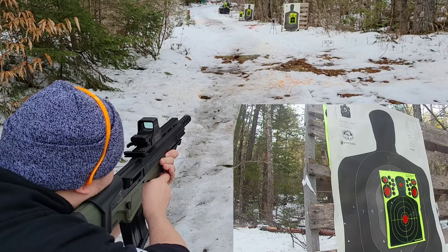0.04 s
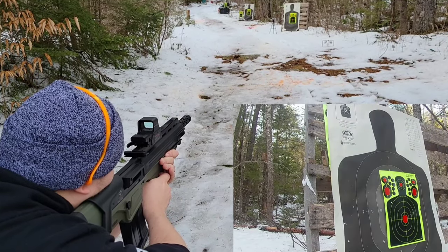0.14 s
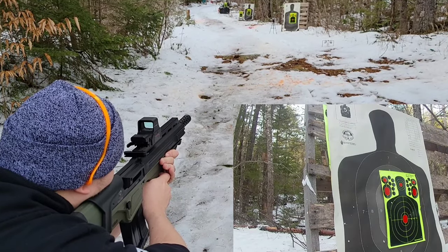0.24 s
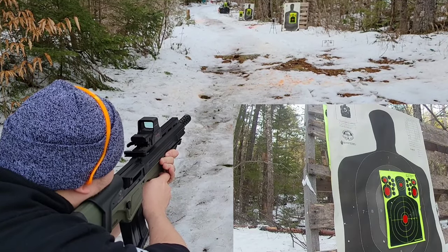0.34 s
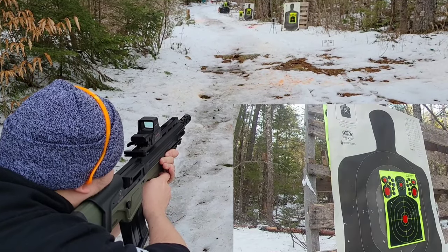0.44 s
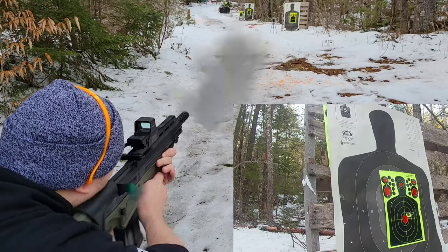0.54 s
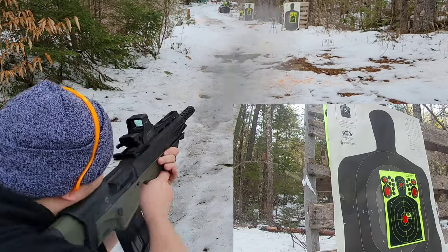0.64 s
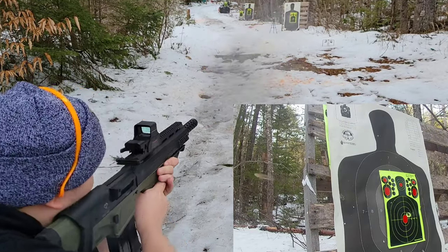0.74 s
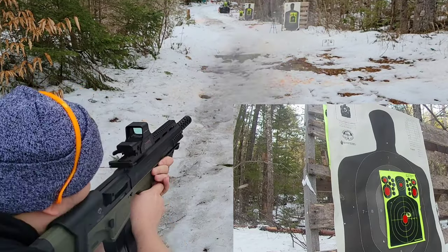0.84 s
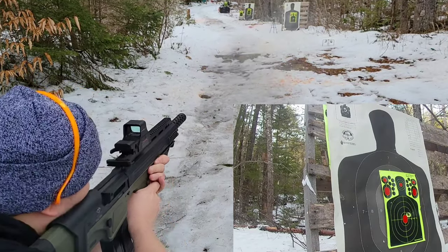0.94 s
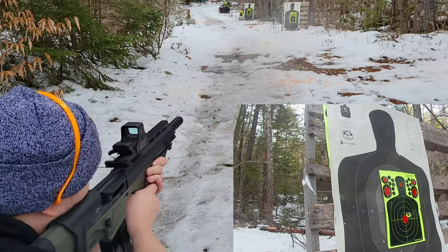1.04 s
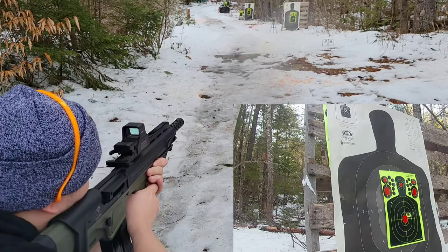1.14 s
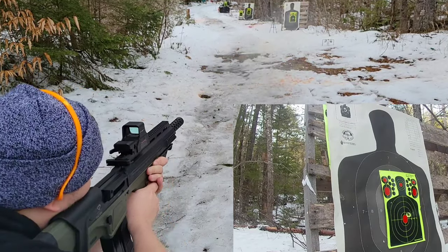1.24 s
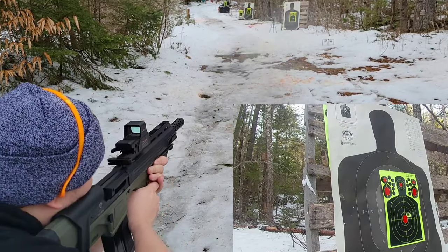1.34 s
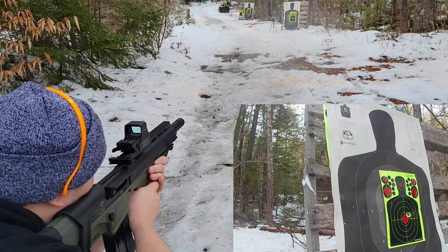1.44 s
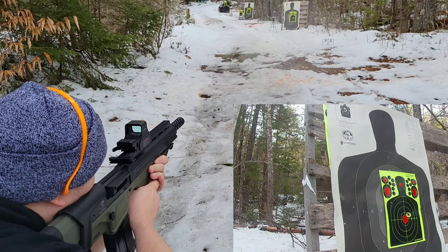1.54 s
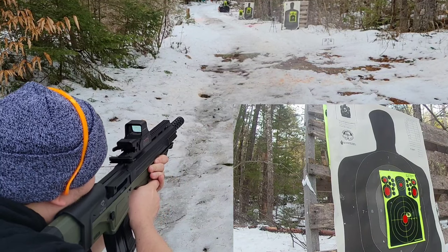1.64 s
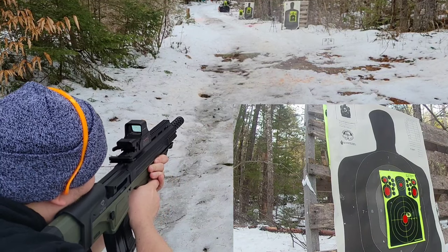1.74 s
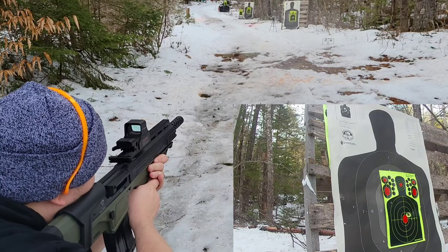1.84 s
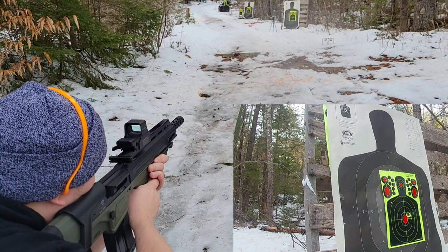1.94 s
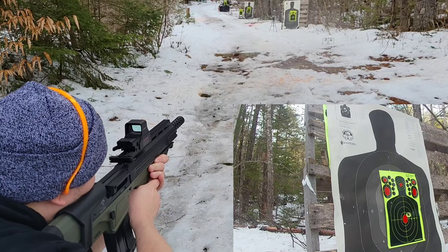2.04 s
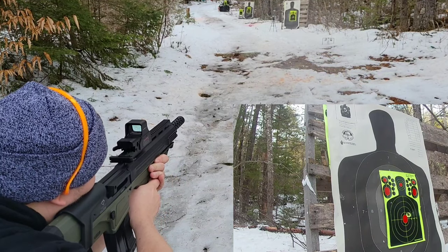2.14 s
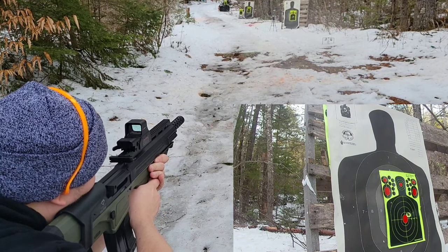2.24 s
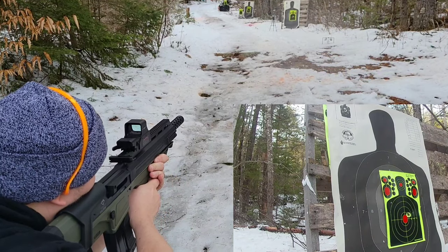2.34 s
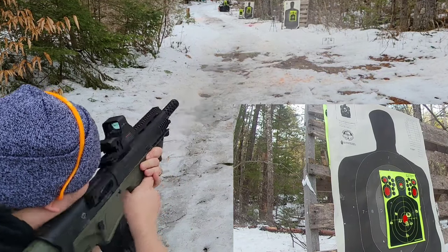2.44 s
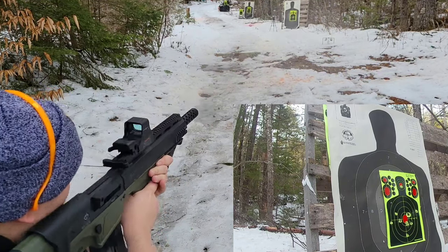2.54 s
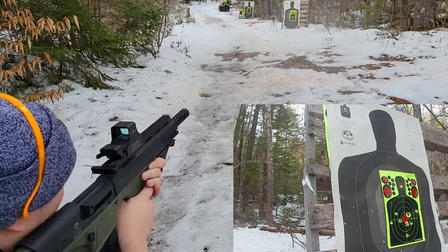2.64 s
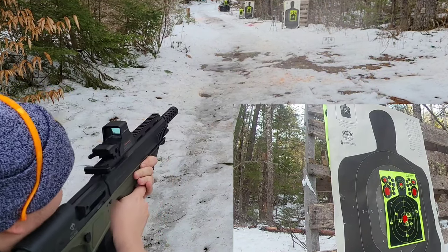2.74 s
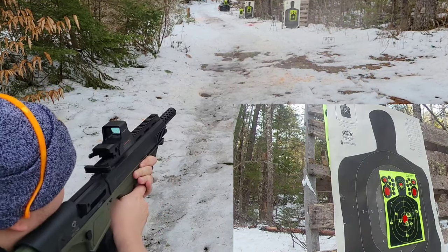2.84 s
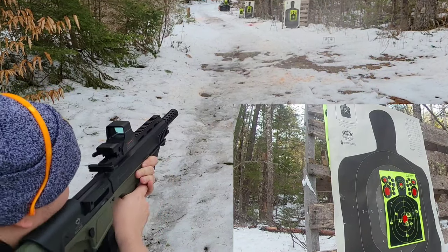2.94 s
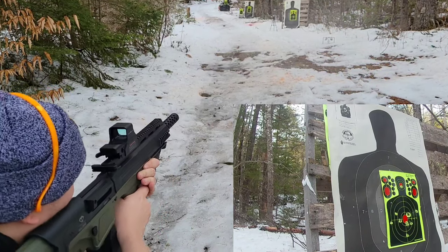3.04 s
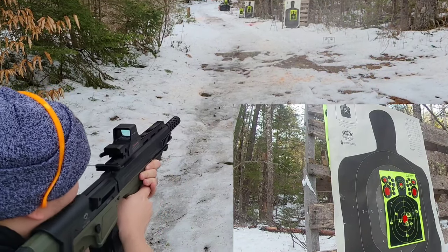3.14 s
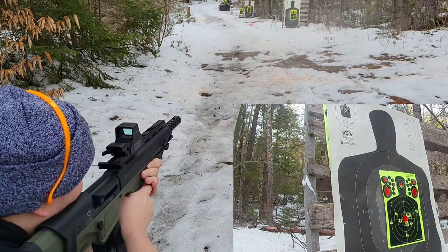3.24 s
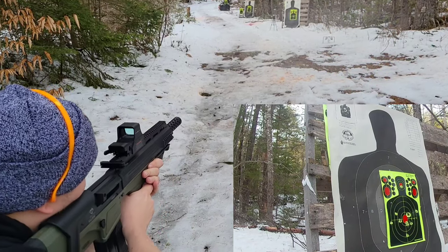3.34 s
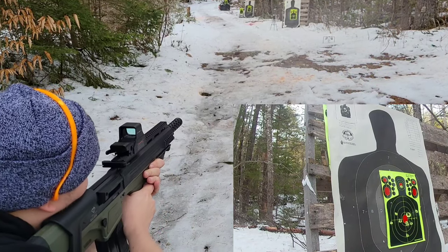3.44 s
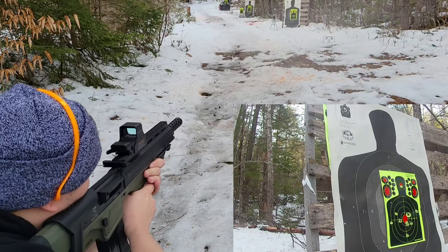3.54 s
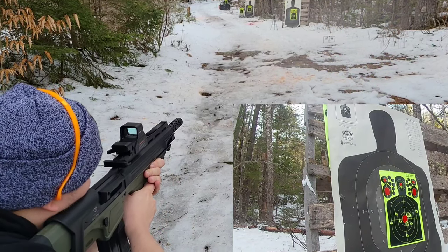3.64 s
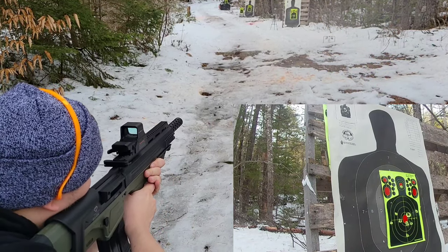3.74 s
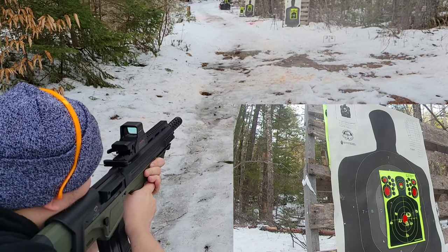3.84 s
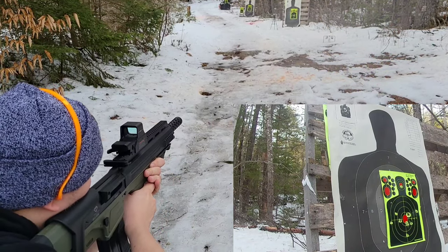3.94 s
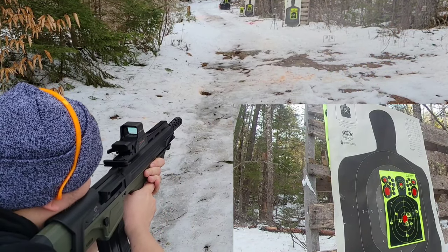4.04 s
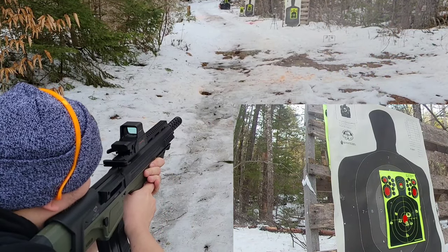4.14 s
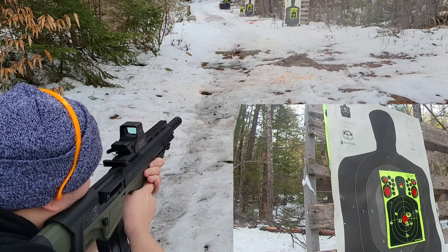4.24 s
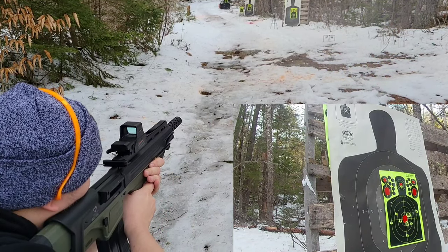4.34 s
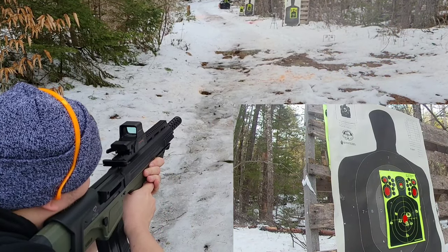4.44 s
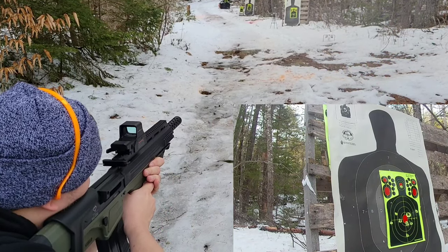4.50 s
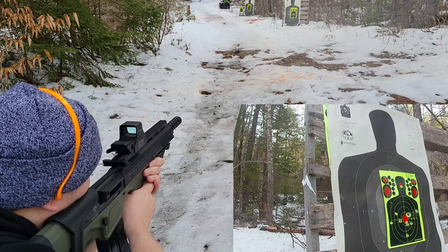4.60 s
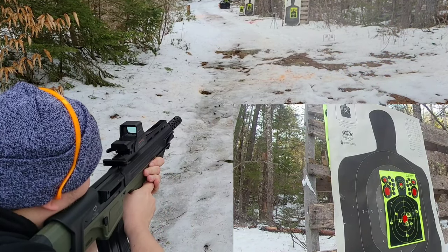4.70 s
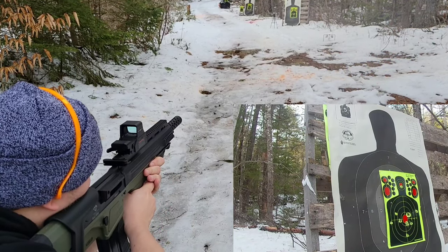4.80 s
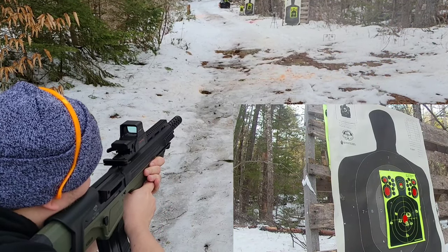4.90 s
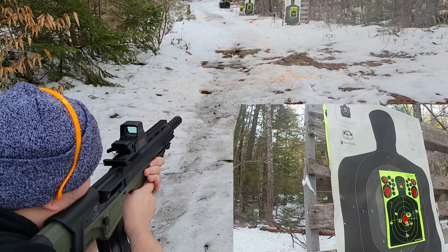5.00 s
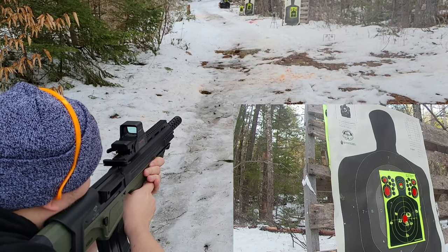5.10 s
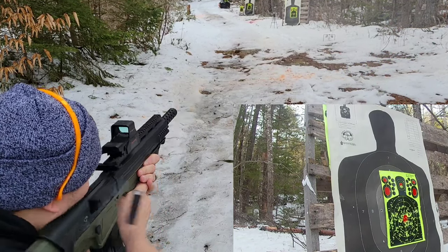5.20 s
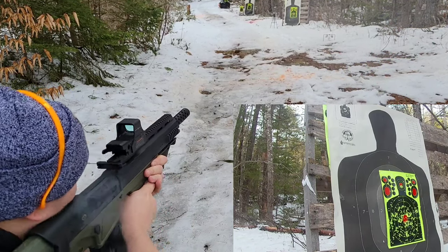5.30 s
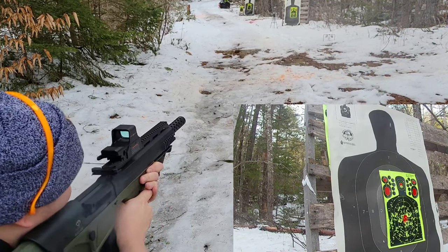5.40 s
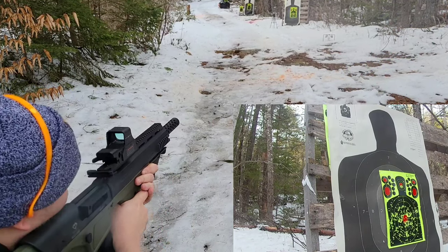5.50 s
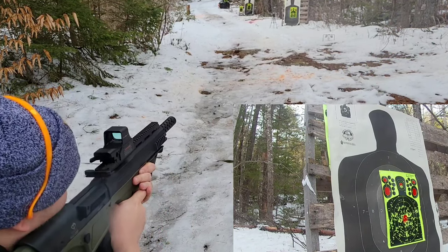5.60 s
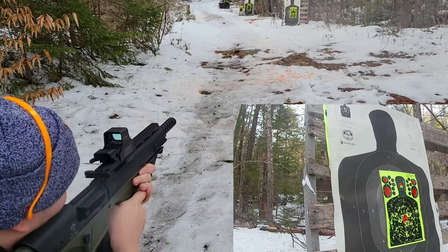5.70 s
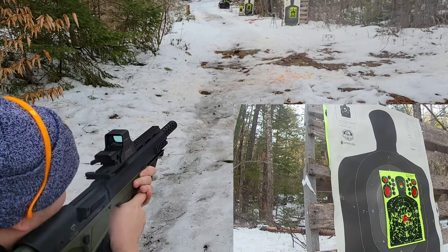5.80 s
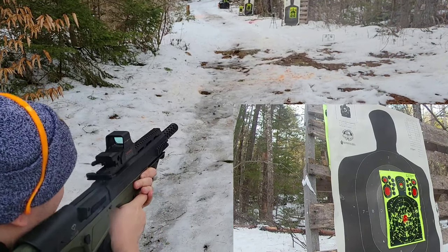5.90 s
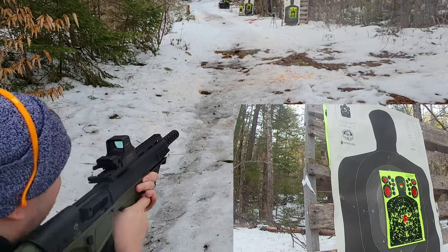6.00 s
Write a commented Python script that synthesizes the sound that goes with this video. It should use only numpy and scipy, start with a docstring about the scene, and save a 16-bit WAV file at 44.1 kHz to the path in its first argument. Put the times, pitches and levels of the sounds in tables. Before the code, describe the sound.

A self-loading shotgun fires three times at close range, each harsh bang rolling off through the forest, with faint clicks and shell clinks.

```python
"""Faint open air, then three shots from a self-loading shotgun, close by on a snowy range in the woods.
Each bang swells in on a short metallic rush, overloads the microphone with a hard rasp and a low thump,
and rolls away among the trees. The bolt slams shut just after each shot; the trigger and action click
as the gun is handled, and loose metal and falling shells clink."""
import sys
import numpy as np
from scipy import signal
from scipy.io import wavfile
from scipy.ndimage import uniform_filter1d

SR = 44100
rng = np.random.default_rng(int(sys.argv[2]) if len(sys.argv) > 2 else 0)


def transcribe(signal):
    """Save signal, clipped to [-1, 1], as a 16-bit WAV file at the path in sys.argv[1]."""
    frames = np.atleast_2d(signal).T
    limited = np.clip(frames, -1, 1)
    pcm = np.round(limited * 32767).astype(np.int16)
    wavfile.write(sys.argv[1], SR, pcm)


N = 267246

# How alike the two microphone ports hear. Each row: frequency in Hz, correlation.
PORT_LIKENESS = [(40, .92), (200, 0.96), (300, 0.81), (450, -0.35), (650, .12), (950, -0.44), (1500, -0.61),
                 (2050, 0.24), (3100, 0), (16000, -0.14)]
# The bed of outdoor air. Each row: frequency in Hz, relative level in dB.
AIR_COLOUR = [(20, -5.5), (65, -1.5), (130, -10), (300, -13), (600, -16.5), (1200, -20.5), (2000, -27),
              (3000, -32.5), (7200, -40.5), (8500, -47), (16000, -50)]
# The shots. Each row: start in seconds, blast in dB, woods in dB, bite near 2 kHz in dB, thump in dB,
# thump bass tilt in dB per octave down, thump delay in seconds, bolt delay in seconds, bolt in dB.
SHOTS = [(0.5878, -2, -12.5, 4, -16, 8, 0.012, 0.1, -10.5),
         (2.4369, -6.5, -15.5, 0, -0.5, -1, 0.0097, 0.087, -5.5),
         (5.2382, -7.5, -16, 2, -4.5, 5, 0.0194, 0.0855, -16.5)]
# Colour and decay of the opening rush, near blast, forest echo, steel clash and gun-body knock.
# Each row: frequency in Hz, relative level in dB, time to fall 60 dB in seconds.
RUSH_BANDS = [(24.98, 2.5, 0.77), (92.15, 3, 0.84), (220, -8.5, 0.94), (500, -0.5, 1), (800, -3, 0.97),
              (1280, -2.5, 0.81), (1498, 6, 0.94), (2202, -8.5, 0.94), (3260, -1, 1), (4420, -7, 0.89),
              (9400, -13.5, 0.99), (15500, -11.5, 0.76)]
BLAST_BANDS = [(20.07, -4, .4), (60, 4, 0.34), (264, 3, 0.6), (453, -5, 0.3), (754, -2, 0.52),
               (890, -3.5, 0.93), (1470, 1, 0.74), (2000, -3.5, 0.35), (2620, -8, 0.35), (3430, -6.5, .4),
               (5000, -11.5, .42), (7500, -13, .4), (8950, -19.5, 0.39), (12700, -14, .33),
               (16000, -16.5, .3)]
WOODS_BANDS = [(20, -9, 0.78), (50, -1, 0.34), (83.2, 11.5, 1.3), (127, -4.5, 1.6), (283, -1, 3.91),
               (420, -1, 3.36), (664, 0.5, 2.836), (1100, -1, 2.5), (1470, -8.5, 2.49), (2050, -10.5, 2.09),
               (2550, -15.5, 1.875), (4470, -17.5, 1.216), (7650, -19, 0.76), (8800, -28.5, 0.68),
               (14000, -24.5, 0.28)]
STEEL_BANDS = [(200, -23, 0.02), (2080, -4.5, .04), (4580, -8, .04), (6500, 4.5, 0.037), (9800, -11.5, .04),
               (12700, 1, 0.055), (15500, -3.5, 0.045)]
KNOCK_BANDS = [(300, -19, 0.034), (800, -10, 0.03), (1210, 8, .03), (1710, -15, 0.021), (2280, -1, 0.032),
               (2800, 0, 0.023), (3300, 0, 0.033), (4000, -15, 0.024), (5960, -10, 0.027),
               (9000, -16, 0.027), (16000, -47, 0.022)]
# The metallic ring in each rush. Each row: pitch in Hz, relative level in dB.
RUSH_TONES = [(1520, -10.5), (3020, -17), (3620, -13)]
# Modes of the microphone housing. Each row: multiple of the lowest pitch, relative level in dB.
HOUSING_MODES = [(1, -2.5), (1.379, -7), (2.279, -10)]
# Low resonances rocked by the blast. Each row: pitch in Hz, level in dB, time to fall 60 dB in seconds.
THUMP_MODES = [(202.7, -1, 0.22), (120.5, -10, 0.17), (46, -18.5, 0.1)]
# Low buffets of air. Each row: peak time in seconds, level in dB, pitch in Hz, left minus right in dB.
BUFFETS = [(0.671, -8, 95, 18), (2.497, -4.5, 125, 0), (5.2649, -7.5, 124, 4)]
# Trigger and action clicks. Each row: start in seconds, level in dB, ring pitch in Hz, snap level in dB.
CLICKS = [(1.872, -47, 3790, -56), (3.449, -59.5, 3500, -80), (3.574, -65, 3500, -80),
          (5.1198, -38, 3280, -59.5)]
# A clicking part's ring. Each row: multiple of its pitch, level in dB, time to fall 60 dB in seconds.
CLICK_MODES = [(0.7, -6, 0.02), (1, -3, 0.023), (1.61, -14.5, 0.024)]
# Loose metal and falling shells. Each row: start in seconds, level in dB.
CLINKS = [(2.750, -36.5), (5.608, -35), (5.619, -37), (5.705, -41), (5.863, -40), (5.954, -46.5)]


def amp(db):
    """Decibels to gain."""
    return 10 ** (np.asarray(db) / 20)


def unit_rms(x):
    """The signal scaled to an rms of 1."""
    return x / np.sqrt(np.mean(x ** 2) + 1e-20)


def wobble(n, size):
    """A random curve of rms 1 that changes over about size samples."""
    return unit_rms(uniform_filter1d(rng.standard_normal(n), size=size))


def read(table, hz, column=1):
    """One column of a table along a logarithmic frequency axis."""
    rows = np.array(table, float)
    return np.interp(np.log(hz + 1), np.log(rows[:, 0] + 1), rows[:, column])


def add(mix, start, sound):
    """Lay a sound into the mix at start seconds."""
    part = mix[:, round(start * SR):][:, :sound.shape[-1]]
    part += sound[..., :part.shape[1]]


def mode(t, hz, t60):
    """One struck resonance, falling 60 dB in t60 seconds."""
    return np.exp(-np.log(1000) * t / t60) * np.sin(2 * np.pi * hz * t)


def port_noise(n, colour, frontal=0, size=1024):
    """Noise at both ports, of rms 1 at its start; colour(t, hz) gives dB as frames x bins."""
    hz = np.fft.rfftfreq(size, 1 / SR)
    t = np.arange(4 * n // size + 5)[:, None] * size / (4 * SR)
    a, b, c, d = rng.standard_normal((len(t), len(hz), 4)).transpose(2, 0, 1)
    left, unrelated = a + 1j * b, c + 1j * d
    # sound from straight ahead reaches both ports alike
    likeness = np.clip(frontal + (1 - frontal) * read(PORT_LIKENESS, hz), -1, 1)
    right = likeness * left + np.sqrt(1 - likeness ** 2) * unrelated
    gain = amp(colour(t, hz)) * np.ones_like(t)
    spectra = np.array([left, right]) * gain / np.sqrt(np.mean(gain[0] ** 2))
    _, noise = signal.istft(spectra.transpose(0, 2, 1), nperseg=size, noverlap=size - size // 4)
    return noise[:, :n] * np.sqrt(3 / size)


def burst(bands, n, bite_db=0, patchy_db=0, frontal=0, size=1024):
    """A noise hit, each band dying at its own speed; patchy_db breaks it into uneven clumps."""
    def colour(t, hz):
        grain = rng.standard_normal((len(t), len(hz)))
        patches = unit_rms(uniform_filter1d(uniform_filter1d(grain, 4, axis=0), 14, axis=1))
        bite = bite_db * np.exp(-.5 * (np.log2((hz + 1) / 2000) / 1.4) ** 2)
        fall = 60 * t / read(bands, hz, column=2)
        return read(bands, hz) + bite - fall + patchy_db * patches * (t > 0)
    return port_noise(n, colour, frontal, size)


def air(level_db=-63.5):
    """The faint steady rumble and hiss of the open air."""
    return amp(level_db) * port_noise(N, lambda t, hz: read(AIR_COLOUR, hz), size=2048)


def rushes(level_db=-8.5, lead_s=0.043, rise_s=0.03, waver=0.02):
    """A short bright rush with a wavering metallic ring swells into each bang."""
    out, t = np.zeros((2, N)), np.arange(SR // 10) / SR
    rise = np.minimum(t / rise_s, 1)
    gate = np.clip((lead_s + 0.013 - t) / 0.0033, 0, 1)  # shuts just after the shot
    for start, *_ in SHOTS:
        tones = 0
        for hz, db in RUSH_TONES:
            cycles = np.cumsum(hz * (1 + waver * wobble(len(t), size=60))) / SR
            tones += amp(db) * np.sin(2 * np.pi * (cycles + rng.random((2, 1))))
        hiss = burst(RUSH_BANDS, len(t), patchy_db=2, size=512)
        rush = hiss * rise ** 2.45 + tones * rise ** 1.8
        add(out, start - lead_s, amp(level_db) * rush * gate)
    return out


def blasts(ground_share=.55, frontal=0.16, crackle_db=1.9, attack_s=0.00092):
    """The muzzle blast scatters off the ground and near branches, then returns from ever farther trees."""
    out, t = np.zeros((2, N)), np.arange(4 * SR) / SR
    attack, bloom = np.minimum(t[:SR] / attack_s, 1), 1 - np.exp(-t / .03)
    ground = burst(BLAST_BANDS, SR, patchy_db=2.5, frontal=frontal)  # answers every shot alike
    for start, blast_db, woods_db, bite_db, *_ in SHOTS:
        branches = burst(BLAST_BANDS, SR, bite_db=bite_db, patchy_db=3.5, frontal=frontal)
        near = np.sqrt(ground_share) * ground + np.sqrt(1 - ground_share) * branches
        crackle = amp(crackle_db * wobble(SR, size=24))
        add(out, start, amp(blast_db) * near * crackle * attack)
        trunks_db = 0.5 * wobble(len(t), size=120) * np.exp(-t / 0.37)  # single trees stand out early
        stands_db = 0.5 * wobble(len(t), size=2000)  # whole stands of trees make the tail roll
        tail = burst(WOODS_BANDS, len(t), bite_db=bite_db, patchy_db=1.5)
        add(out, start, amp(woods_db + trunks_db + stands_db) * tail * bloom)
    return out


def housing(ring_s, upper_db, hz=1494, waver=.075):
    """The microphone housing rings at an unsteady pitch; upper_db weights its higher modes."""
    t, ring = np.arange(SR // 20) / SR, 0
    port_lead = np.array([[0], [.3]])  # radians: one port leads a little
    for k, (multiple, db) in enumerate(HOUSING_MODES):
        pitch = multiple * hz * (1 + waver * wobble(len(t), size=40))
        phase = 2 * np.pi * np.cumsum(pitch) / SR
        ring += amp(db + upper_db * (k > 0)) * np.sin(phase + multiple * port_lead)
    return ring * np.minimum(t / 0.00013, 1) * np.exp(-(t / ring_s) ** 6)


def rasps(front_db=4.5, echo_db=-10.5, echo_s=0.059):
    """Each pressure front shakes the housing, then returns more gently from the edge of the woods."""
    out = np.zeros((2, N))
    for start, blast_db, *_ in SHOTS:
        # a stronger blast rasps longer and harsher
        add(out, start, amp(front_db) * housing(ring_s=0.022 * amp(blast_db), upper_db=3 + blast_db))
        add(out, start + echo_s, amp(echo_db) * housing(ring_s=0.005, upper_db=-3.5))
    return out


def thumps(attack_s=0.0075):
    """The push of the muzzle gas rocks the camera, which booms for a few cycles."""
    out, t = np.zeros((2, N)), np.arange(SR // 2) / SR
    attack = 1 - np.exp(-t / attack_s)
    for start, _, _, _, thump_db, tilt_db, delay_s, *_ in SHOTS:
        for hz, db, t60 in THUMP_MODES:
            octaves_down = np.log2(THUMP_MODES[0][0] / hz)
            level = amp(thump_db + db + tilt_db * octaves_down)
            add(out, start + delay_s, -level * mode(t, hz, t60) * attack)
    return out


def buffets():
    """One low buffet of air follows each bang: a single push between two shallow dips."""
    out, t = np.zeros((2, N)), np.arange(SR // 2) / SR
    for peak_s, db, hz, pan_db in BUFFETS:
        from_peak = np.pi * (hz * t - 1)
        push = (1 - 2 * from_peak ** 2) * np.exp(-from_peak ** 2)
        add(out, peak_s - 1 / hz, amp([[db + pan_db / 2], [db - pan_db / 2]]) * push)
    return out


def action(attack_s=0.0023, clink_attack_s=0.0062, clink_fade_s=.03):
    """Steel on steel: the bolt slams shut, loose metal clinks, small parts ring, knock and snap."""
    out, t = np.zeros((2, N)), np.arange(SR // 6) / SR
    attack = np.minimum(t / attack_s, 1)
    for start, *_, delay_s, bolt_db in SHOTS:
        slam = burst(STEEL_BANDS, len(t), patchy_db=1.5, size=256)
        add(out, start + delay_s, amp(bolt_db) * slam * attack)
    clink_shape = np.minimum(t / clink_attack_s, 1) ** 2 * np.exp(-t / clink_fade_s)
    for start, db in CLINKS:
        clink = burst(STEEL_BANDS, len(t), patchy_db=6, size=256) * clink_shape
        add(out, start, amp([[db - 1.2], [db + 1.2]]) * clink)  # a touch to the right
    for start, db, hz, snap_db in CLICKS:
        ring = sum(amp(mode_db) * mode(t, multiple * hz, t60) for multiple, mode_db, t60 in CLICK_MODES)
        knock = burst(KNOCK_BANDS, len(t), size=256)
        snap = burst(STEEL_BANDS, len(t), size=256) * np.exp(-t / .01)
        add(out, start, (amp(db) * (ring + knock) + amp(snap_db) * snap) * attack)
    return out


def scene():
    """The layers of the gun over the bed of air."""
    return rushes() + blasts() + rasps() + thumps() + buffets() + action() + air()


def record(dry, ceiling=0.9, low_cut_hz=18, high_cut_hz=15800):
    """The microphone sheds the deepest bass, its input flattens the peaks, and the very top is cut."""
    trimmed = signal.sosfilt(signal.butter(2, low_cut_hz, "highpass", fs=SR, output="sos"), dry)
    clipped = trimmed / (1 + (trimmed / ceiling) ** 8) ** (1 / 8)
    high_cut = signal.firwin(511, high_cut_hz, window=("kaiser", 9), fs=SR)
    return signal.oaconvolve(clipped, high_cut[None], "same")


dry = scene()
out = record(dry)
transcribe(out)
```